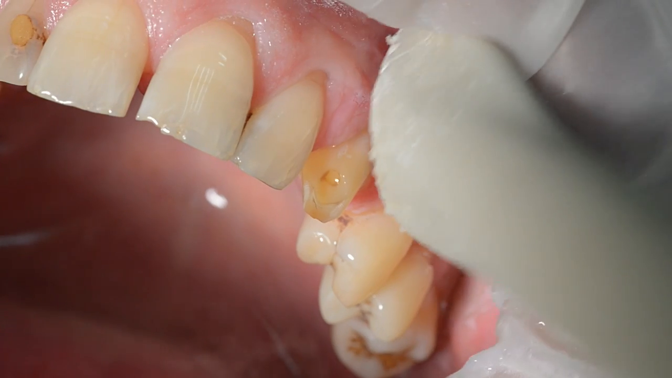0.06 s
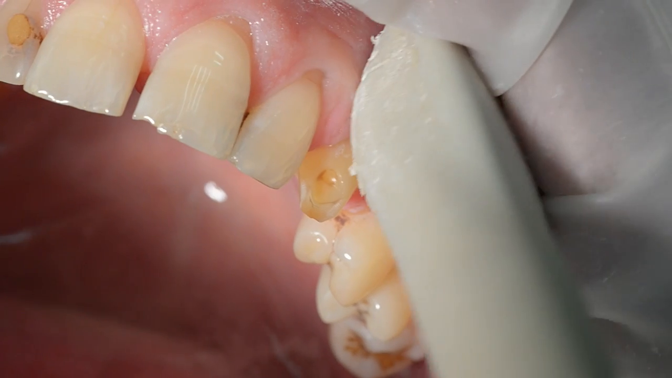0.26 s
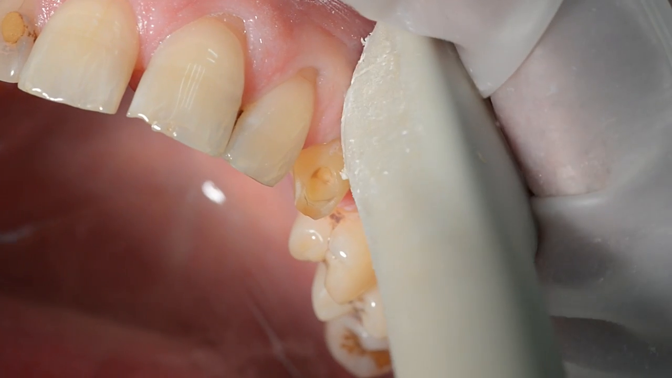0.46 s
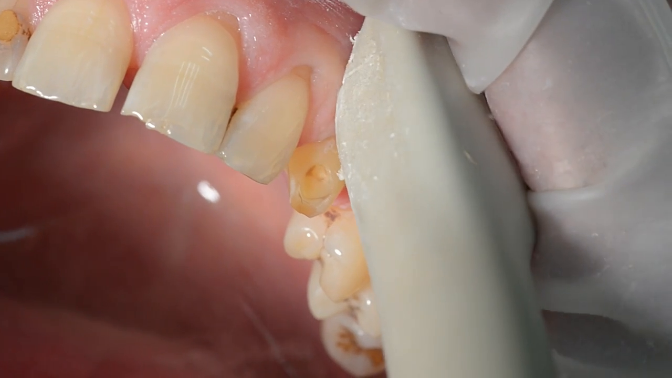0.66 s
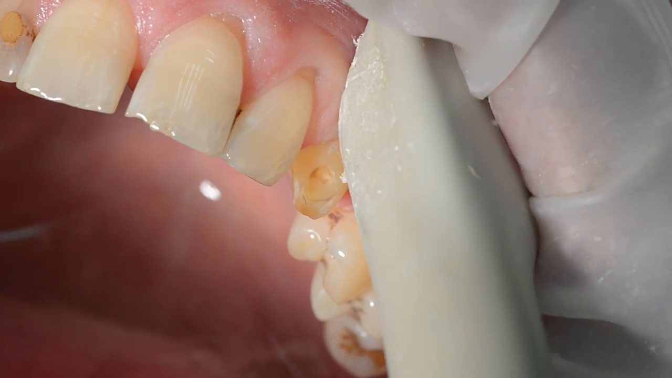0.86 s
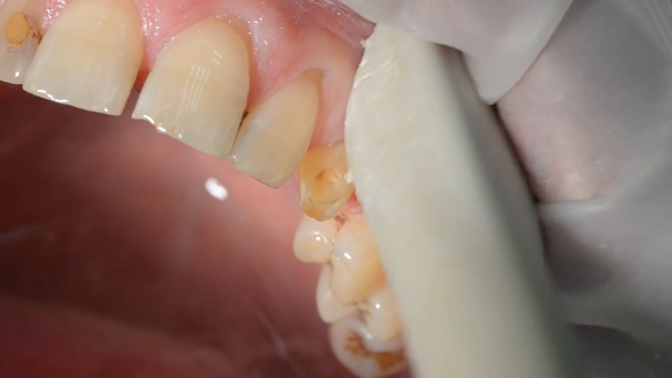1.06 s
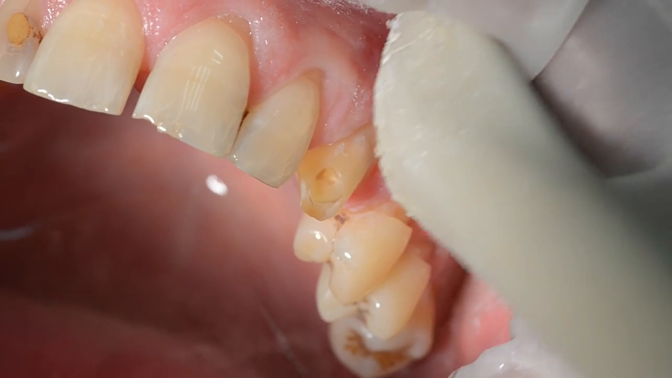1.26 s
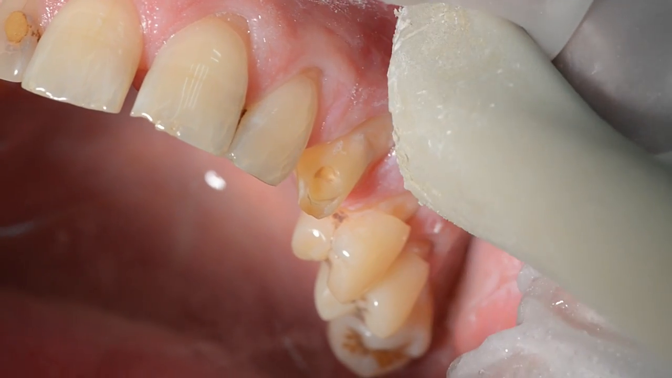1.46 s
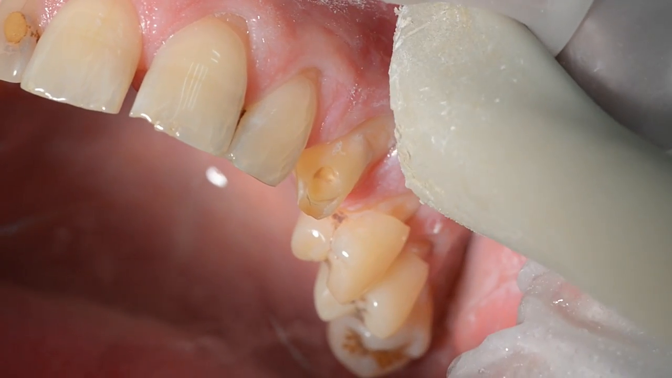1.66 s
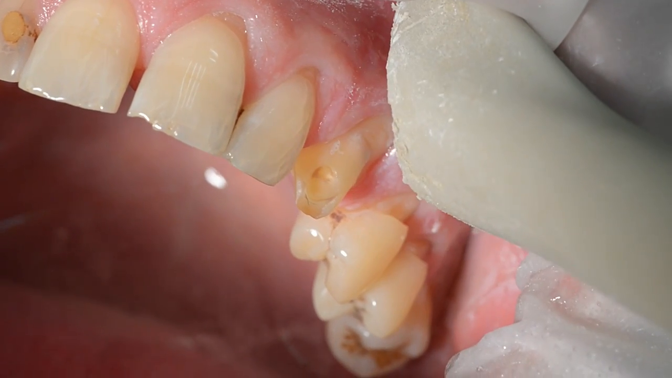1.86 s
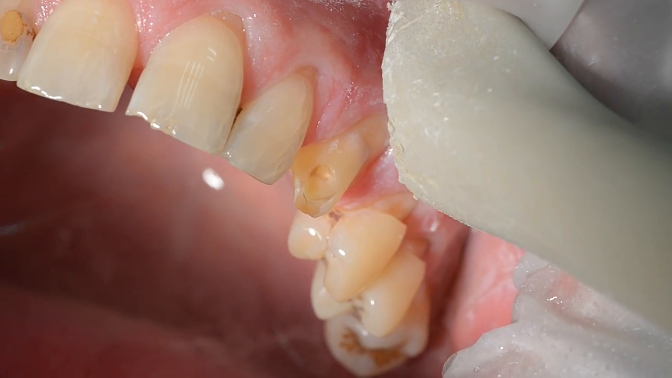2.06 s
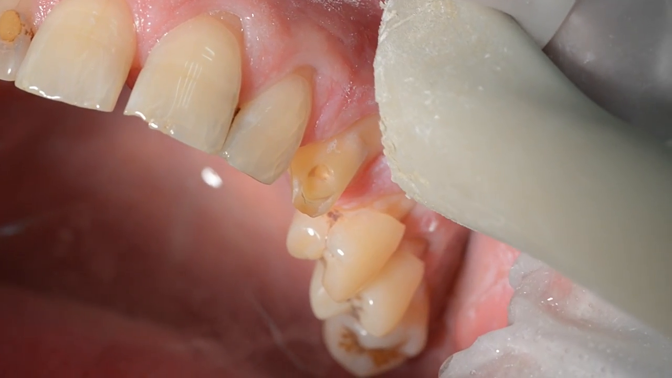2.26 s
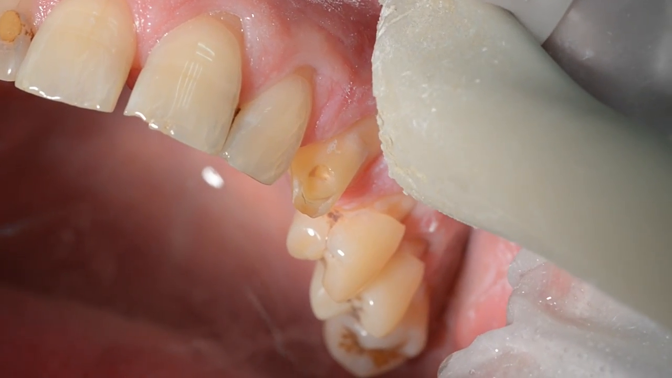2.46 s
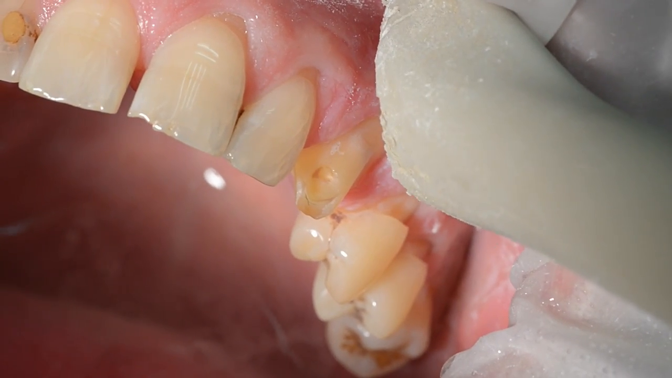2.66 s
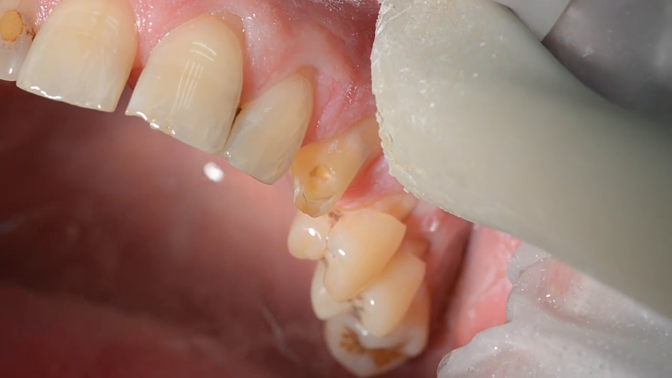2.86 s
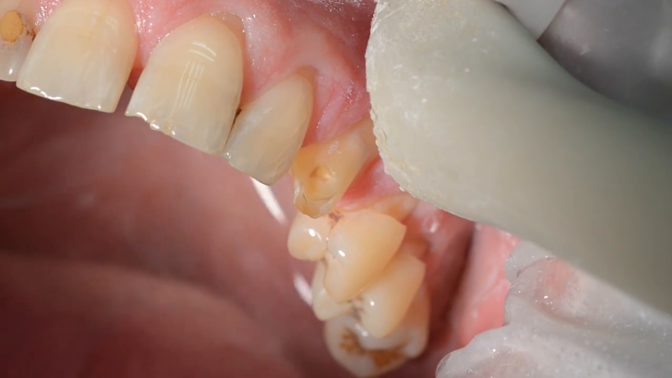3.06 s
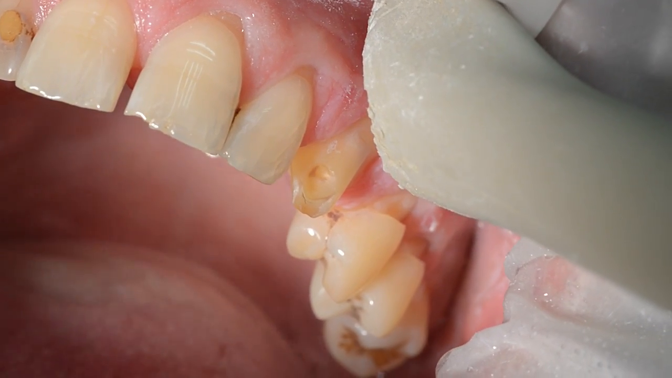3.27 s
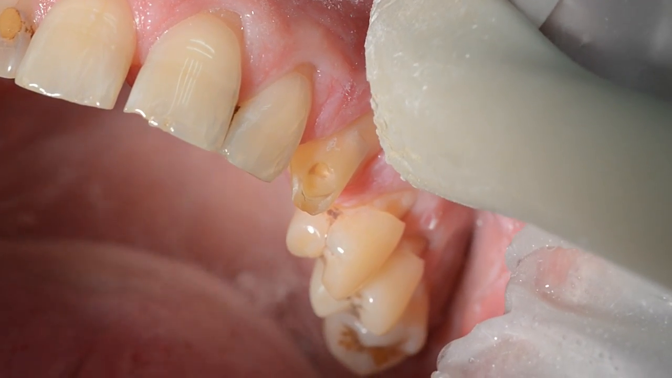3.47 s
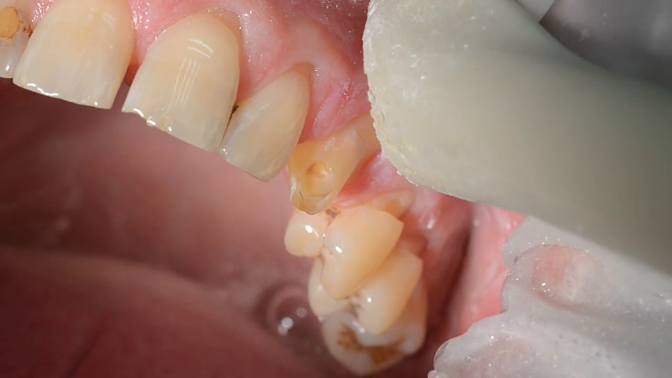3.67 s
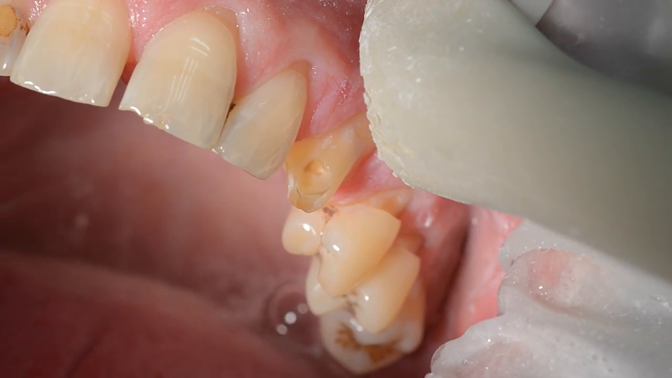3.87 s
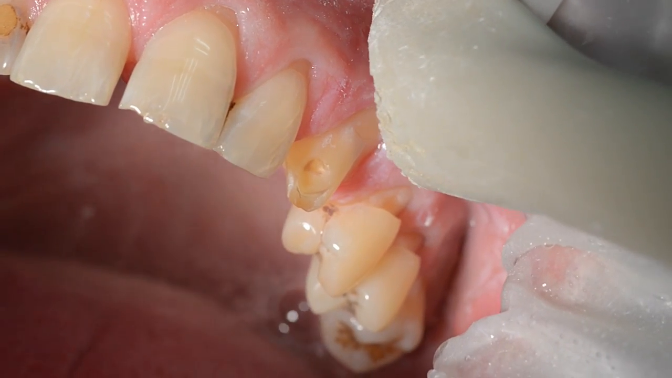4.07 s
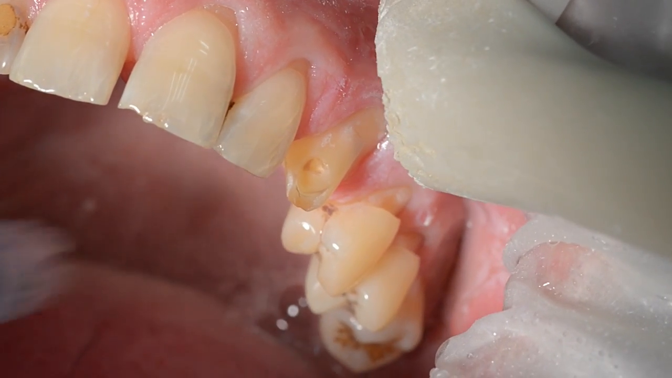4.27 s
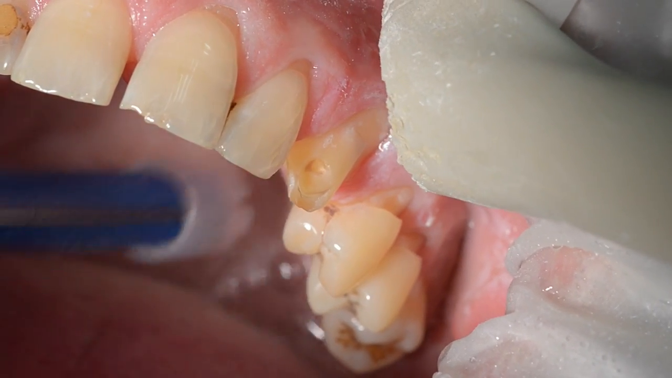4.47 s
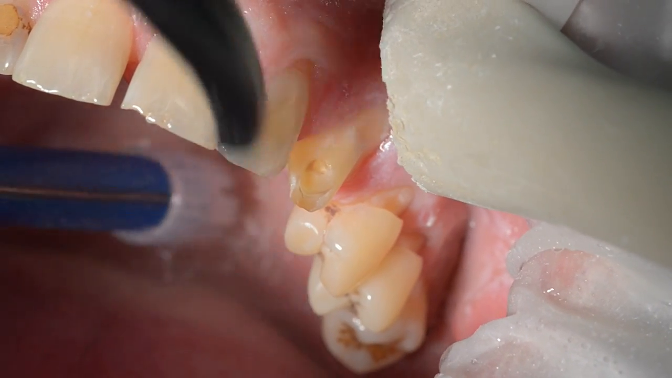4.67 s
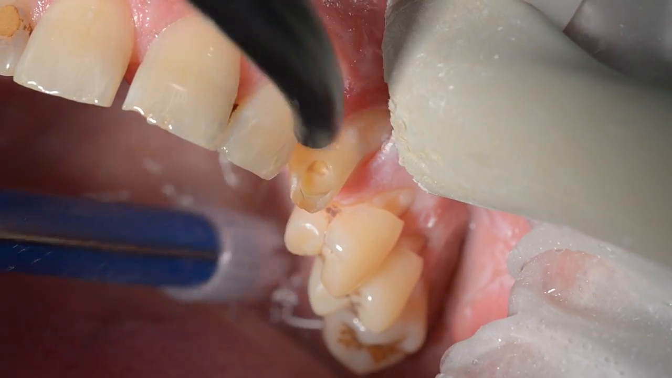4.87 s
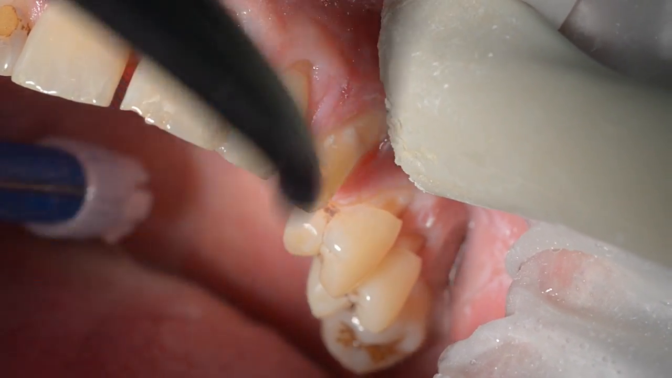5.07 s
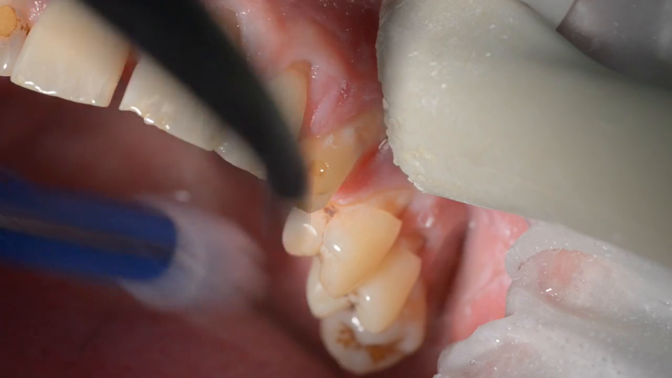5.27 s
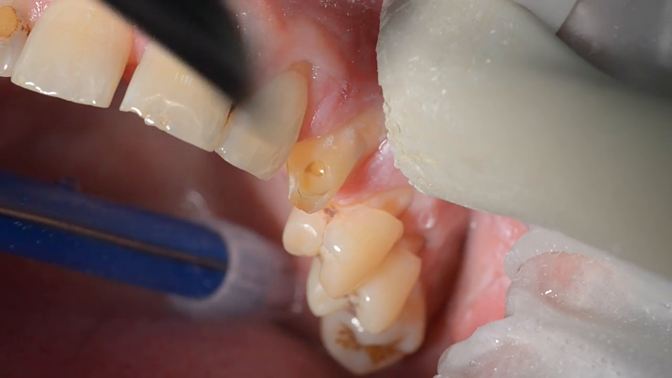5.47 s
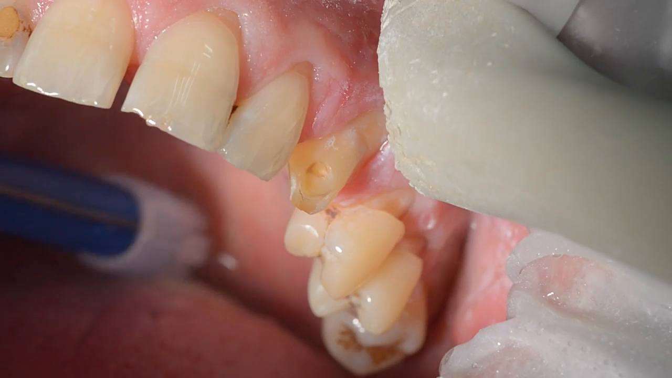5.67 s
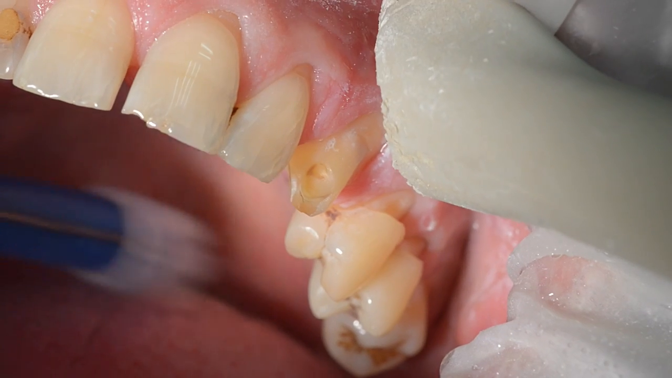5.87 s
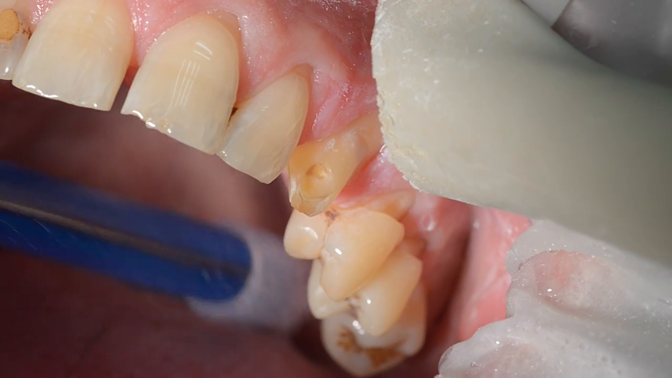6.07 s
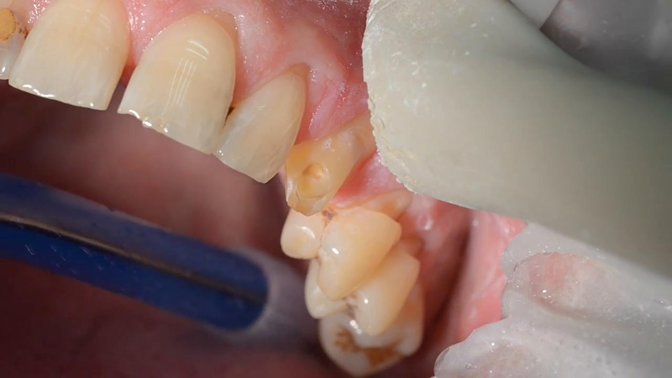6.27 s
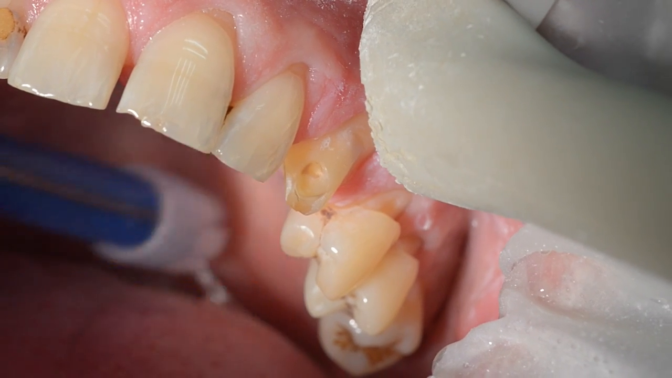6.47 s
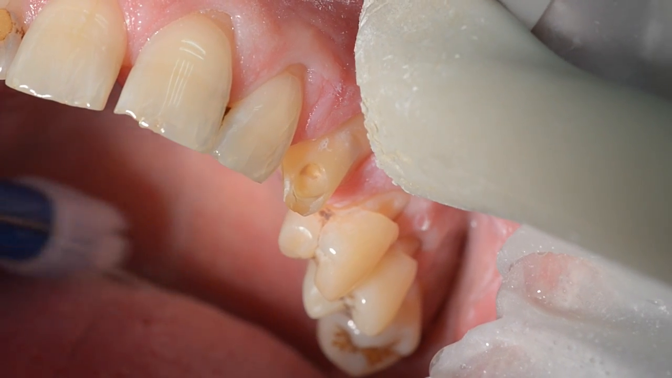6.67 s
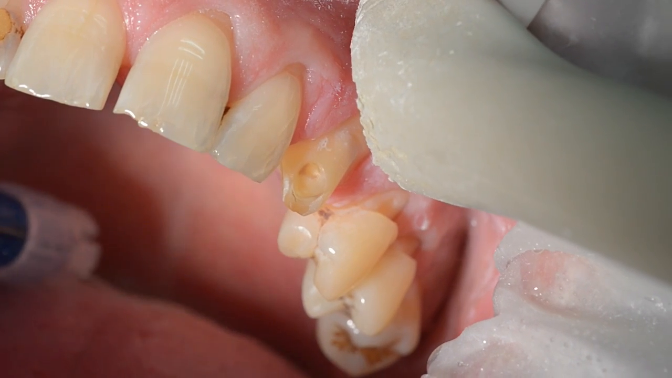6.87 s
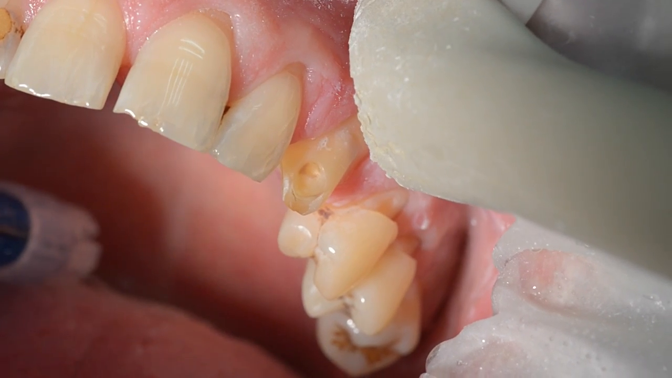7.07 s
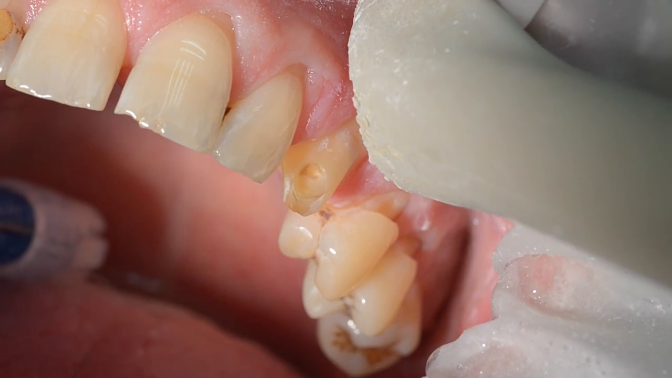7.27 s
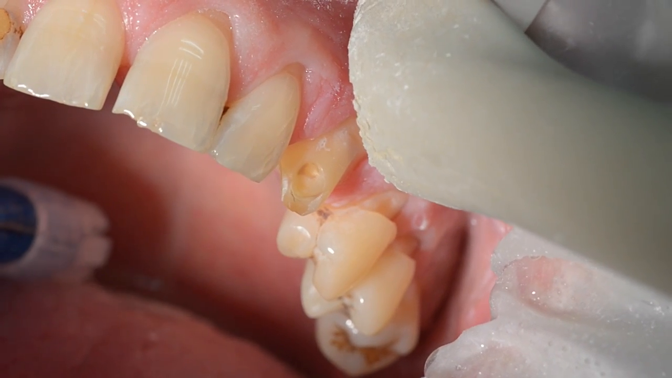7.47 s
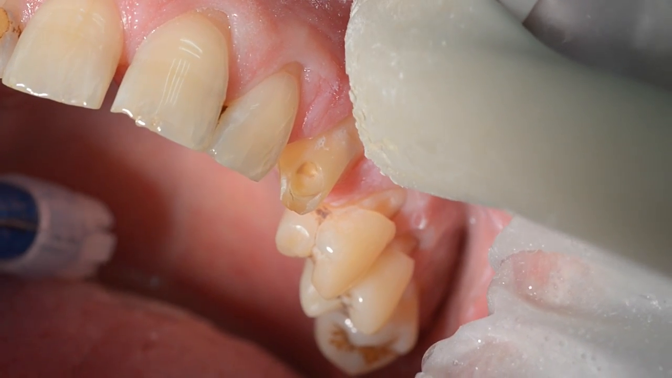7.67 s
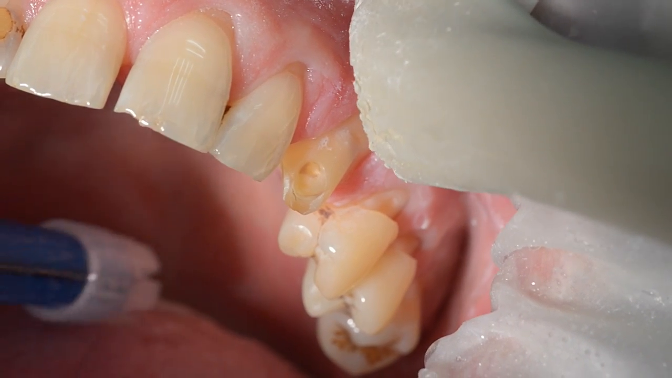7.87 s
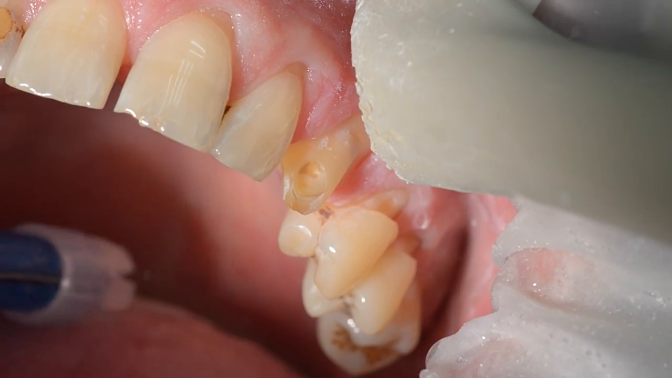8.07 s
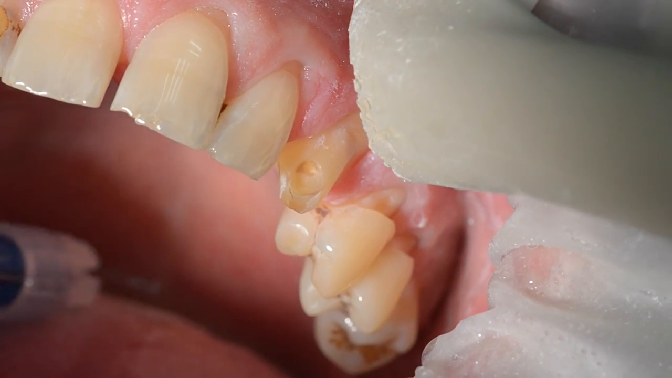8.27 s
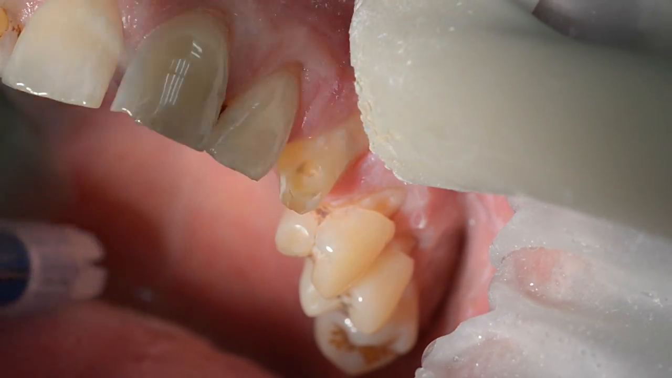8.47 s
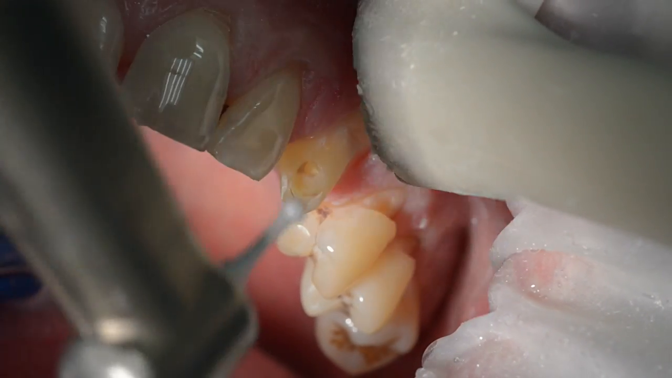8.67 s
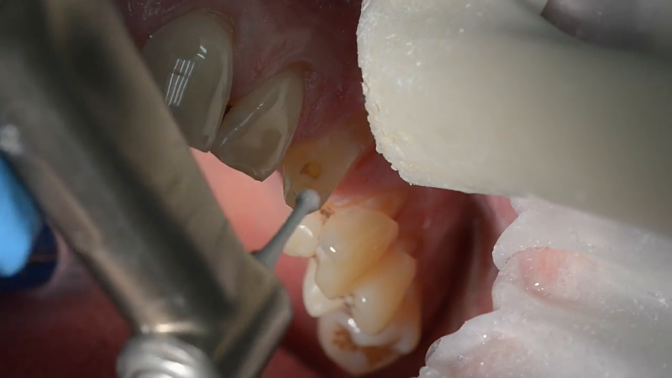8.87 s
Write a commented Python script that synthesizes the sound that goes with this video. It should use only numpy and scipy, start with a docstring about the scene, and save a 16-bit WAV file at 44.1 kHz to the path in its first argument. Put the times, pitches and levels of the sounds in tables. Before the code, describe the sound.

Steady bright suction air, miked closely, sounds beside teeth and cheek in a quiet treatment room with soft ventilation. It opens with fuzzy airy whistles and a broader rush, then calms. Small knocks precede a busy middle of bubbling pops, sharp wet snaps, resonant slurping and sibilant bursts of spray. The water clears, leaving hiss, a hollow bubbling hum and occasional round pops to the end.

```python
"""A dental suction tube hisses close to an open mouth: turbulent noise coloured by tip, gap and mouth.
Its hollow, a resonator driven by air and bubbles, hums near 1.2 kHz; beads of water pop as decaying sines.
Halfway through, the tip dips into pooled water and slurps as resonant rattles, amid short puffs of spray.
A rush of air and fuzzy whistles are bands of noise; a few dull knocks ring over the ventilation's hum."""
import sys
import numpy as np
from scipy import signal
from scipy.fft import rfft, irfft, next_fast_len
from scipy.io import wavfile
from scipy.ndimage import uniform_filter1d

SR = 44100
rng = np.random.default_rng(int(sys.argv[2]) if len(sys.argv) > 2 else 0)


def waveform_to_disk(signal):
    """Save audio, clipped to [-1, 1], as 16-bit WAV at the path in sys.argv[1]."""
    frames = np.transpose(np.atleast_2d(signal))
    scaled = np.clip(frames, -1, 1) * 32767
    samples = np.round(scaled).astype(np.int16)
    wavfile.write(sys.argv[1], SR, samples)


N = 392931
TIME = np.arange(N) / SR
# frames of 128 samples and the bins of a 512-point transform
FRAME_S = np.arange(N // 128 + 5)[:, None] * 128 / SR
BIN_HZ = np.fft.rfftfreq(512, 1 / SR)


def amp(db):
    """Decibel law: amplitude ratio of a level."""
    return 10 ** (np.asarray(db) / 20)


def evened(x):
    """Normalisation to unit root-mean-square."""
    return x / np.sqrt(np.mean(x ** 2) + 1e-20)


def curve(rows, t):
    """Linear interpolation of rows (s, value) in time."""
    rows = np.asarray(rows, float)
    return np.interp(t, rows[:, 0], rows[:, 1])


def read(points, hz):
    """Interpolation of a spectrum in dB on a log-frequency axis."""
    f, db = np.transpose(points)
    return np.interp(np.log(hz + 1), np.log(f + 1), db)


def bell(x, centre, width):
    """Gaussian that falls to 1/e at one width from its centre."""
    return np.exp(-((x - centre) / width) ** 2)


def add(mix, s, sound):
    """Superposition: adds the sound to the mix in place, from time s."""
    part = mix[max(round(s * SR), 0):][:len(sound)]
    part += sound[:len(part)]


def colour(x, points):
    """Minimum-phase filtering: a causal filter with the given spectrum."""
    log_gain = np.log(amp(read(points, abs(np.fft.fftfreq(8192, 1 / SR)))))
    # the Hilbert transform of the log gain supplies the phase
    taps = np.fft.ifft(np.exp(np.conj(signal.hilbert(log_gain)))).real[:4096]
    return signal.oaconvolve(x, taps)[:len(x)]


def resonate(x, hz, width):
    """Heterodyne resonance: a two-pole low-pass in a frame that turns at the pitch hz."""
    turn = np.exp(2j * np.pi * np.cumsum(hz * np.ones(len(x))) / SR)
    r = np.exp(-np.pi * abs(width) / SR)
    return (turn * signal.lfilter([(1 - r) ** 2], [1, -2 * r, r * r], x / turn)).real


def drift(size, channels=1):
    """Smoothed chance over size frames and, if channels > 1, over that many bins."""
    z = rng.standard_normal((len(FRAME_S), len(BIN_HZ) if channels > 1 else 1))
    return evened(uniform_filter1d(uniform_filter1d(z, size, 0), channels, 1))


def turbulence(shape_db, flicker_db):
    """Turbulent noise of unit level by short-time synthesis; its colour follows shape_db by frame."""
    gain = amp(shape_db)
    gain = gain / np.sqrt((gain ** 2).sum(1, keepdims=True))
    gain = gain * amp(flicker_db)
    z = rng.standard_normal(gain.shape) + 1j * rng.standard_normal(gain.shape)
    return evened(signal.istft((z * gain).T, nperseg=512, noverlap=384)[1][:N])


def droplets(per_s, spread_db):
    """Random impulses of either sign, a few of them much larger than the rest."""
    size = amp(spread_db * np.minimum(rng.exponential(1, N), 3))
    return evened(size * rng.choice([-1, 1], N) * (rng.random(N) < per_s / SR))


# colour of the ventilation: frequency_hz, relative level_db per Hz
VENT_COLOUR = [(25, -49), (45, -33), (80, -25), (100, -16.5), (145, -5.5), (175, -6.5), (193, 3.5),
               (215, -8), (270, -0.5), (305, -1), (400, -4.5), (650, -8), (1500, -0.5), (2500, -18.5),
               (6000, -24)]
# slow swell of the ventilation: time_s, level_db
VENT_LEVEL = [(0, -58), (1.3, -62), (1.85, -58.5), (3.3, -60.5), (4.3, -56), (5.5, -58.5), (6.2, -55),
              (7.5, -57), (8.9, -57.5)]


def ventilation():
    """Broadband flow noise, coloured by a fixed spectrum, with a slowly swelling level."""
    return amp(curve(VENT_LEVEL, TIME)) * evened(colour(rng.standard_normal(N), VENT_COLOUR))


# dull knocks and small ticks around the chair:
# start_s, level_db, pitch_hz, width_hz, t60_s, rise_s
KNOCKS = [(3.148, -45, 2216, 1500, 0.062, .001), (3.172, -43.5, 597, 140, 0.19, .008),
          (3.17, -49.5, 326, 159, 0.24, .006), (3.176, -41, 2060, 1500, .08, 0.0024),
          (3.667, -44, 1910, 1400, 0.065, .002), (3.695, -37, 344, 60, 0.11, 0.014),
          (6.751, -42.5, 1700, 1600, 0.25, 0.0022), (6.765, -39, 580, 380, 0.28, 0.00074),
          (6.764, -41, 820, 160, 0.14, .001), (6.77, -42, 315, 110, 0.3, 0.0025),
          (6.937, -39, 298, 200, .06, 0.0018)]


def knocks(direct_db=4, direct_ring=.5):
    """Impact and reverberation: a brief ring of the struck thing, then the room's decaying noise."""
    out, t = np.zeros(N), np.arange(SR // 3) / SR
    for s, db, hz, width, t60, rise in KNOCKS:
        # drop the first half, where the resonance is still building up
        body = evened(resonate(rng.standard_normal(2 * len(t)), hz, width)[len(t):])
        body = body + amp(direct_db) * np.exp(-direct_ring * width * t) * np.sin(2 * np.pi * hz * t)
        fade = amp(-60 * t / t60) * (1 - np.exp(-t / rise))
        add(out, s, amp(db) * np.sqrt(np.mean(fade ** 2)) * evened(fade * body))
    return signal.sosfilt(signal.butter(3, 200, "high", fs=SR, output="sos"), out)


# broader rush while the cheek is pulled aside: frequency_hz at rest, relative level_db per Hz
RUSH_COLOUR = [(600, -23), (1000, -19), (1400, -4.5), (1700, 7.5), (1900, -4), (2150, 8.5), (2500, -6),
               (3100, -1), (4500, -9), (8000, -50)]
# time_s, level_db
RUSH_LEVEL = [(.15, -68), (.24, -57), (.29, -49.5), (.55, -47), (.68, -42.5), (.8, -39), (.92, -41),
              (1.08, -47), (1.14, -59), (1.3, -57)]
# shift of that colour: time_s, centre_hz
RUSH_HZ = [(.2, 1410), (.5, 1730), (.75, 2130), (.9, 2040), (1.1, 1930)]


def rush(rest_hz=2000, patchy_db=3.0):
    """Flow noise of a wider gap; its spectrum scales up in pitch, then eases back a little."""
    shape = read(RUSH_COLOUR, BIN_HZ * rest_hz / curve(RUSH_HZ, FRAME_S))
    gate = (TIME > RUSH_LEVEL[0][0]) & (TIME < RUSH_LEVEL[-1][0])
    return gate * amp(curve(RUSH_LEVEL, TIME)) * turbulence(shape, patchy_db * drift(size=6, channels=3))


# fuzzy whistles where air grazes an edge:
# peak_s, half_length_s, pitch_hz, glide_hz_per_s, level_db before the trim
WHISTLES = [(.078, 0.076, 6570, 3500, -35), (.11, 0.29, 4350, 0, -44), (.55, 0.49, 11250, -350, -55),
            (1.165, .06, 14000, 0, -52), (3.473, 0.073, 7350, 1800, -42.5), (3.448, .04, 12100, 0, -52),
            (3.952, 0.38, 11240, 0, -50.5), (4.649, .034, 6876, 0, -34.5), (5.256, .022, 6470, 0, -35.5),
            (5.46, .05, 10900, 3500, -36), (5.974, 0.034, 9200, -2000, -44), (6.67, .04, 11900, 0, -51),
            (7.724, 0.04, 9150, 0, -48)]
# the longer a whistle lasts, the more its pitch blurs
WHISTLE_WIDTH_HZ, WHISTLE_WANDER_HZ_PER_S = 290, 1100


def whistles(whistle_db=-1):
    """Edge tones: narrow bands of noise that swell, slide and fade."""
    out = np.zeros(N)
    for s, half, hz, glide, db in WHISTLES:
        t = np.arange(max(s - 2 * half, 0), s + 2 * half, 1 / SR)
        width = WHISTLE_WIDTH_HZ + WHISTLE_WANDER_HZ_PER_S * half
        tone = evened(resonate(rng.standard_normal(len(t)), hz + glide * (t - s), width))
        add(out, t[0], amp(db + whistle_db) * bell(t, s, half) * tone)
    return out


# puffs of spray and spurts of air: peak_s, rise_s, fall_s, level_db before the trim,
# echo_peak_spacing_hz, treble_tilt_db_per_octave, singing_pitch_hz
SPRAYS = [(.265, 0.037, 0.098, -40, 1120, 0.5, 14400), (4.654, 0.036, 0.04, -31.5, 1720, 4.5, 10200),
          (4.73, 0.036, 0.07, -42.5, 1750, -8, 2410), (4.925, 0.049, 0.086, -36.5, 1270, -3.5, 13900),
          (5.037, .014, 0.026, -42, 1240, -12, 3500), (5.18, .02, 0.019, -44, 1270, -8, 3800),
          (5.249, 0.039, 0.039, -34.5, 1270, -2.5, 8600), (5.41, 0.015, .015, -39, 1780, -3.5, 7200),
          (5.46, 0.027, 0.042, -36.5, 1540, -7.5, 4580), (5.51, 0.017, 0.035, -34, 1440, 8, 8600),
          (5.58, .084, .25, -46.5, 1440, -3, 8520), (6.26, 0.15, 0.099, -44, 1120, 1, 9800)]
# colour shared by the puffs: frequency_hz, relative level_db per Hz
SPRAY_COLOUR = [(900, -47), (1500, -11), (2400, -5.5), (3000, -3.5), (4800, -1.5), (5800, -1.5), (6700, 6),
                (7800, 0.5), (8700, 6), (9400, 0), (10400, 7), (11400, 3.5), (12600, 1.5), (15600, -4)]


def spray(spray_db=2.0, echo_db=3.0, sing_db=7, sing_width_hz=280, spit_db=-5, sputter_depth=2.0):
    """Jet noise, comb-coloured by its echo off the teeth and broken up by spitting drops."""
    out = np.zeros(N)
    patches_db = 3.8 * drift(size=8, channels=5) + 2.5 * drift(size=2, channels=9)
    air = turbulence(np.zeros((1, len(BIN_HZ))), patches_db)
    jet = air + amp(spit_db) * droplets(per_s=900, spread_db=3)
    for s, rise, fall, db, spacing_hz, tilt_db, sing_hz in SPRAYS:
        t = np.arange(s - 2 * rise, s + 3 * fall, 1 / SR)
        level = np.where(t < s, np.exp(-abs((t - s) / rise) ** 3), bell(t, s, fall))
        hz = np.fft.rfftfreq(len(t), 1 / SR)
        shape = read(SPRAY_COLOUR, hz) + echo_db * np.cos(2 * np.pi * hz / spacing_hz)
        shape = shape + tilt_db * np.log2(np.maximum(hz, 2000) / 9000)
        shape = shape + sing_db * bell(hz, sing_hz, sing_width_hz)
        mist = evened(irfft(rfft(jet[round(t[0] * SR):][:len(t)]) * amp(shape), len(t)))
        # about 120 drops a second, each lifting the level for some 4 ms
        drops = rng.uniform(0, 1, len(t)) * (rng.random(len(t)) < 120 / SR)
        bursts = signal.lfilter([1], [1, -np.exp(-1 / (.004 * SR))], drops)
        sputter = evened(1 + sputter_depth * np.tanh(bursts))
        add(out, t[0], amp(db + spray_db) * level * sputter * mist)
    return out


# water rattling at the rim of the tip: start_s, length_s, level_db at the start, pitch_hz
SLURPS = [(4.608, .175, -37, 3540), (4.846, 0.25, -37.5, 3520), (5.22, 0.045, -41.5, 3930),
          (5.319, 0.098, -42, 3480), (5.48, .05, -37.5, 3490), (5.578, 0.27, -47, 3430),
          (6.226, 0.17, -40.5, 3220)]
# drops snapping at the rim at set times: start_s, peak_db before the trim, pitch_hz
SNAPS = [(4.635, -22, 3750), (4.6624, -22, 3650), (4.7417, -26, 3710), (4.7726, -20, 3640),
         (5.037, -23.5, 3510), (5.4968, -23, 3320), (6.1787, -27.5, 3180), (6.3955, -24.5, 3220),
         (6.4822, -31.5, 3180)]
# each slurp catches quickly, weakens as the water drains, and lets go
SLURP_ATTACK_S, SLURP_SAG_DB_PER_S, SLURP_RELEASE_S = 0.015, 13, 0.027


def slurp(rattle_db=0.0, snap_db=-3, snap_s=0.002, width_hz=300):
    """Air-column resonance: water shreds at the rim and rings the short column in the tip."""
    drive = droplets(per_s=420, spread_db=2) + .6 * rng.standard_normal(N)
    drive = signal.sosfilt(signal.butter(2, 1200, "high", fs=SR, output="sos"), drive)
    out, t = np.zeros(N), np.arange(SR // 2) / SR
    for s, length, db, hz in SLURPS:
        column = evened(resonate(drive[round(s * SR):][:len(t)], hz, width_hz))
        level = np.minimum(t / SLURP_ATTACK_S, 1) * bell(np.maximum(t, length), length, SLURP_RELEASE_S)
        add(out, s, amp(rattle_db + db - SLURP_SAG_DB_PER_S * t) * level * column)
    t = np.arange(SR // 40) / SR
    for s, db, hz in SNAPS:
        swell = t / snap_s * np.exp(1 - t / snap_s)
        add(out, s, amp(db + snap_db) * swell * np.sin(2 * np.pi * hz * t))
    return out


# further beads follow the dip at random; their strength follows the drive of the hollow
DIP_S, BEADS_PER_S, BEAD_OVER_DRIVE_DB, BEAD_SPREAD_DB = 4.25, 9, 11, 1
BEAD_HZ, BEAD_SPREAD_HZ = 1093, 60


def random_beads(count=80):
    """Random arrivals at uneven (gamma) intervals, as rows (start_s, peak_db, pitch_hz)."""
    s = DIP_S + np.cumsum(rng.gamma(2, .5, count)) / BEADS_PER_S
    size, pitch = rng.uniform(-1, 1, (count, 2)).T * np.sqrt(3)  # unit deviation
    peak_db = curve(DRIVE, s) + BEAD_OVER_DRIVE_DB + BEAD_SPREAD_DB * size
    return list(zip(s, peak_db, BEAD_HZ + BEAD_SPREAD_HZ * pitch))


# beads of water popping in the tube at set times: start_s, peak_db before the trim, pitch_hz
POPS = [(4.2192, -25.5, 1030), (4.254, -16.5, 1140), (4.2708, -16, 1170), (4.3838, -23.5, 1150),
        (4.414, -21, 1050), (4.443, -28, 1087), (4.456, -26.5, 980), (4.5254, -20, 1060),
        (4.5424, -15, 1170), (4.6162, -25, 1046), (4.6474, -20, 1178), (4.7202, -19.5, 1200),
        (4.747, -21.5, 1220), (4.7835, -20.5, 1160), (4.8168, -15.5, 1155), (4.8718, -22.5, 1000),
        (5.1029, -19.5, 1190), (5.1302, -18, 1115), (5.1765, -26.5, 1140), (5.408, -22.5, 1040),
        (5.6843, -21, 1100), (5.7295, -26.5, 1117), (5.8896, -24.5, 1070), (6.0194, -24.5, 1076),
        (6.2466, -27.5, 1040), (6.3343, -29.5, 1100), (6.4014, -30.5, 1030), (6.5918, -32, 1170),
        (6.6967, -29.5, 1070), (6.9682, -22.5, 1160), (7.3512, -14, 1170), (7.645, -32, 1100),
        (8.0252, -30, 1120), (8.294, -24.5, 1055), (8.3768, -28, 930), (8.5025, -30, 1080),
        (8.527, -27, 1020), (8.6459, -28.5, 1013), (8.709, -29.5, 1130), (8.893, -25.5, 1020)]


def pops(pop_db=-0.5, swell_s=0.0018, ring_hz=1228, ring_db=-15, ring_t60=0.12, echo_s=0.016, echo_db=-17):
    """Transient excitation: each bead blips, the hollow rings on and the far end of the tube echoes."""
    out, t = np.zeros(N), np.arange(SR // 8) / SR
    swell = (t / swell_s * np.exp(1 - t / swell_s)) ** 2.7  # a soft start keeps the blip round
    ring = amp(ring_db - 60 * t / ring_t60) * (1 - bell(t, 0, swell_s))
    since = t - swell_s
    for s, db, hz in list(POPS) + random_beads():
        phase, stray = rng.uniform(0, 2 * np.pi), rng.uniform(-1.1, 1, 2)
        ring_turns = ring_hz * (1 + .02 * stray[0]) * since  # the water detunes the hollow a little
        blip = swell * np.sin(2 * np.pi * hz * since + phase)
        blip = blip + ring * np.sin(2 * np.pi * ring_turns + phase)
        add(out, s, amp(db + pop_db) * blip)
        add(out, s + echo_s * (1 + .1 * stray[1]), amp(db + pop_db + echo_db) * blip)
    # the small hollow gives no low notes
    return signal.sosfilt(signal.butter(5, 700, "high", fs=SR, output="sos"), out)


# colour of the hollow of the tube: frequency_hz, relative level_db per Hz
HOLLOW_COLOUR = [(200, -73), (500, -54), (700, -20.5), (900, -11.5), (1020, -6), (1130, -2.5), (1222, 3),
                 (1300, -3.5), (1400, -20), (1600, -18.5), (2000, -28.5), (2800, -72)]
# how hard the flow drives the hollow: time_s, level_db before the trim
DRIVE = [(0, -49.5), (.22, -49), (.29, -39), (.5, -39), (.66, -44.5), (.94, -43), (1.3, -51), (2.1, -50.5),
         (3.6, -56), (4.35, -52.5), (4.7, -31.5), (4.88, -42), (5.25, -44.5), (5.65, -42.5), (5.85, -49),
         (7.0, -45), (7.35, -50.5), (8.91, -50.5)]
# bubbles as against smooth air in that drive: time_s, share (0-1)
WETNESS = [(0, 0.03), (.4, 0.07), (1.3, 0.64), (4.1, 0.1), (4.6, 0.47), (5.8, 0.28), (6.7, 0.55),
           (8.9, 0.52)]
# the pitch of the hollow drifts, highest near 3.3 s: time_s, peak_hz
HOLLOW_HZ = [(0, 1203), (.4, 1224), (1.2, 1206), (2.8, 1216), (3.3, 1265), (3.8, 1260), (4.4, 1240),
             (6, 1230), (8.9, 1217)]


def hollow(hum_db=0.45):
    """Cavity resonance: air and a stream of tiny bubbles keep the hollow of the tube ringing."""
    wet = np.clip(curve(WETNESS, TIME), 0, 1)
    smooth_air = np.sqrt(1 - wet) * rng.standard_normal(N)
    drive = smooth_air + np.sqrt(wet) * droplets(per_s=170, spread_db=2)
    ringing = signal.hilbert(colour(drive, HOLLOW_COLOUR), next_fast_len(N))[:N]
    detune_hz = curve(HOLLOW_HZ, TIME) - 1222  # from the peak of its colour
    hum = (ringing * np.exp(2j * np.pi * np.cumsum(detune_hz) / SR)).real
    return amp(hum_db + curve(DRIVE, TIME)) * evened(hum)


def mouth_colour(size=300, channels=3, stretch=0.58):
    """Drifting modes: chance peaks and dips of the mouth's own air, bending with the gap."""
    slow = drift(size=size, channels=channels)
    bins = np.arange(len(BIN_HZ))
    bend = (curve(GAP, FRAME_S[:, 0]) / GAP[0][1]) ** stretch
    bent = np.array([np.interp(bins / b, bins, row) for b, row in zip(bend, slow)])
    return bent * (BIN_HZ > 4000)


# air drawn past the tip, held at the cheek: frequency_hz, relative level_db per Hz
HISS_CHEEK = [(880, -49), (1500, -29), (1790, -28.5), (2380, -11.5), (2700, -9.5), (3090, -10), (3580, -9),
              (4400, 5.5), (5350, -2.5), (6440, 0), (7460, -6), (8310, -1.5), (9810, -4.5), (11500, -14.5),
              (15500, -10)]
# the same with the tip inside the mouth: frequency_hz, relative level_db per Hz
HISS_MOUTH = [(880, -21), (1500, -19), (1950, -3), (2830, 1), (3220, 3.5), (3480, -0.5), (3950, -0.5),
              (4310, -13), (4670, -7.5), (5150, -9.5), (5560, -5), (7760, -2), (8390, -8), (9440, -5.5),
              (15500, -25.5)]
# weight of the inside colour against the cheek colour: time_s, share (0-1)
INSIDE = [(0, 0.36), (3.2, 0.45), (4.2, 0.6), (6.0, 0.74), (6.8, 0.57), (8.9, 0.68)]
# how hard the suction draws air: time_s, hiss level_db before the trim
AIRFLOW = [(0, -40.5), (.3, -39), (.65, -40.5), (1.2, -41), (1.41, -44.5), (1.7, -42.5), (2.7, -43),
           (3.6, -44.5), (4.05, -42), (4.55, -42), (4.82, -44), (5.5, -41), (5.85, -44), (6.27, -39),
           (6.5, -43.5), (6.73, -41), (7.6, -43), (8.91, -43.5)]
# narrow resonances of the tip: pitch_hz, width_hz, lift_db
TIP = [(3237, 330, 5), (3750, 390, 0.5), (4380, 580, 2.5), (5250, 360, 2), (5780, 250, 4.5), (6530, 370, 2),
       (8330, 150, 4.5), (9620, 240, 7), (10150, 270, 1), (10590, 740, 6.5), (11350, 370, 4),
       (12800, 400, 3), (14000, 500, 2.5)]
# the throat of the tip opens as it nears the water and shuts again:
# time_s, lift_db at 3.92 kHz (the band at 3.17 kHz sinks as much)
OPENING = [(0, -1), (.3, -3.5), (1.3, 1), (2.8, 1), (3.4, 2), (3.9, 4), (4.5, 7.5), (5.8, 4.5), (6.2, 0.5),
           (6.8, 0), (8.9, 4)]
# the gap between tip and cheek ripples the hiss; its deepest notch slides as the hand moves:
# time_s, notch_hz
GAP = [(0, 7550), (1.3, 7600), (2.15, 7530), (2.43, 8000), (2.65, 7250), (3.2, 7100), (3.55, 8700),
       (4.1, 9000), (5.75, 9350), (6.5, 8400), (7.3, 8550), (7.6, 9250), (8.1, 7550), (8.45, 7400),
       (8.9, 6535)]
# treble relative to the hiss, which the colour follows in part: time_s, level_db
TREBLE = [(0, -10), (.3, -8), (.7, -20), (1.3, -13), (3.6, -16), (4.0, -8), (4.5, -11), (5.8, -11),
          (6.9, -14.5), (7.6, -11), (8.15, -7), (8.9, -15)]
CALM_DB, SWIRL_DB_PER_DB = -41.5, 0.67  # above this flow the hiss breaks into swirling treble flecks


def suction(hiss_db=0.12, usual_treble_db=-13, treble_follow=0.64, patchy_db=1.0, flutter_db=0.62,
            ripple_db=2, ripple_hz=1480, notch_db=3.0, notch_hz=190):
    """Turbulent flow noise: air tears past the tip, coloured by the place of the tip in the mouth."""
    inside = np.clip(curve(INSIDE, FRAME_S), 0, 1)
    shape = (1 - inside) * read(HISS_CHEEK, BIN_HZ) + inside * read(HISS_MOUTH, BIN_HZ)
    shape = shape - 50 * np.clip(1 - BIN_HZ / 880, 0, 1)  # the small tip radiates no bass
    shape = shape + sum(db * bell(BIN_HZ, hz, width / 2) for hz, width, db in TIP)
    shape = shape + curve(OPENING, FRAME_S) * (bell(BIN_HZ, 3920, 260) - bell(BIN_HZ, 3170, 260))

    off_hz = BIN_HZ - curve(GAP, FRAME_S)
    comb = np.cos(np.pi * off_hz / ripple_hz) ** 4  # narrow dips between broad peaks
    shape = shape - ripple_db * (comb - comb.mean()) * bell(off_hz, -400, 2600)
    shape = shape - notch_db * bell(off_hz, 0, notch_hz)

    bright_db = np.clip(curve(TREBLE, FRAME_S) - usual_treble_db, -5, 6)
    shape = shape + treble_follow * bright_db * np.clip((BIN_HZ - 11000) / 700, 0, 1)
    shape = shape + 1.2 * mouth_colour()

    flicker = patchy_db * drift(size=30, channels=4) + flutter_db * drift(size=10)
    excess_db = np.maximum(curve(AIRFLOW, FRAME_S) - CALM_DB, 0)
    swirl_db = SWIRL_DB_PER_DB * excess_db * np.clip(BIN_HZ / 8000, 0, 2)
    flicker = flicker + swirl_db * drift(size=14, channels=6)
    return amp(hiss_db + curve(AIRFLOW, TIME)) * turbulence(shape, flicker)


def scene():
    """Superposition of the sources, the same in both channels."""
    mouth = suction() + hollow() + rush() + pops() + slurp() + spray() + whistles()
    # small sources give no bass
    mouth = signal.sosfilt(signal.butter(2, 300, "high", fs=SR, output="sos"), mouth)
    mono = mouth + knocks() + ventilation()
    return np.array([mono, mono])


def record(dry):
    """Band limitation: a linear-phase low-pass at 15.72 kHz."""
    taps = signal.firwin(1023, 15720, window=("kaiser", 9), fs=SR)
    return signal.oaconvolve(dry, taps[None], "same")


dry = scene()
out = record(dry)
waveform_to_disk(out)
```